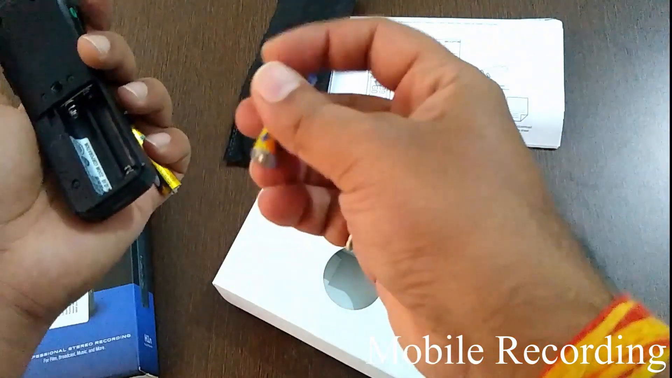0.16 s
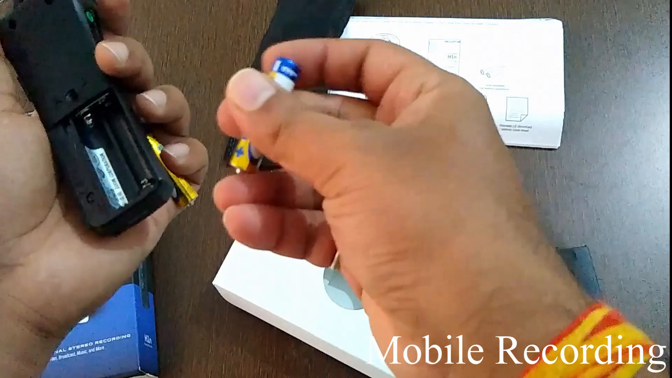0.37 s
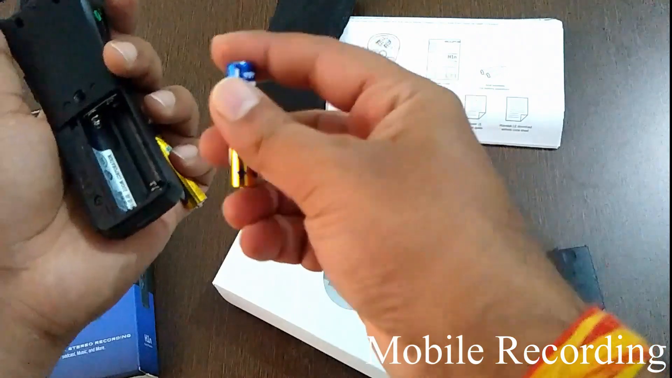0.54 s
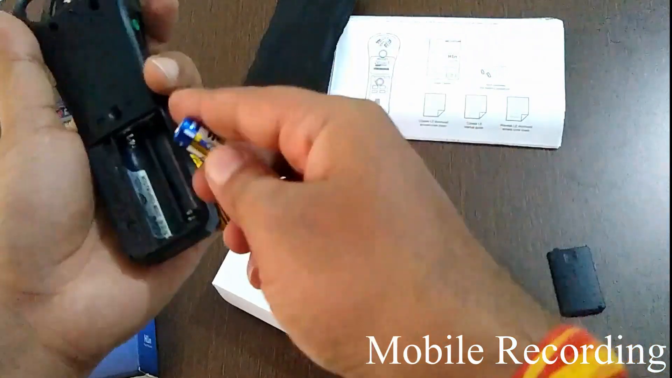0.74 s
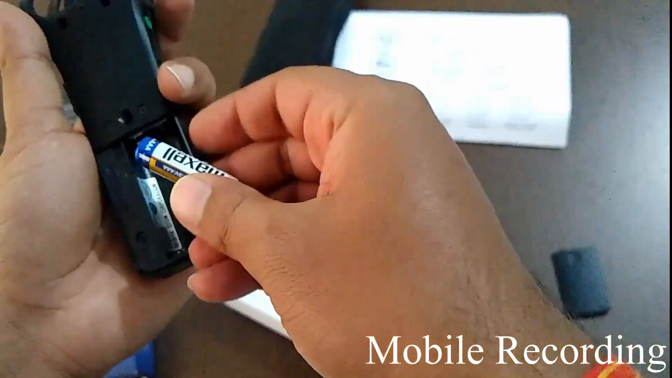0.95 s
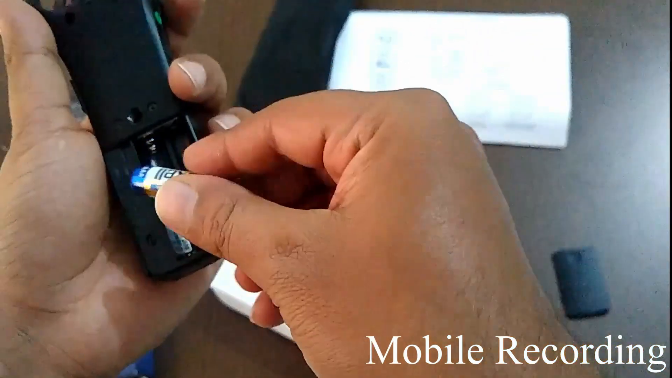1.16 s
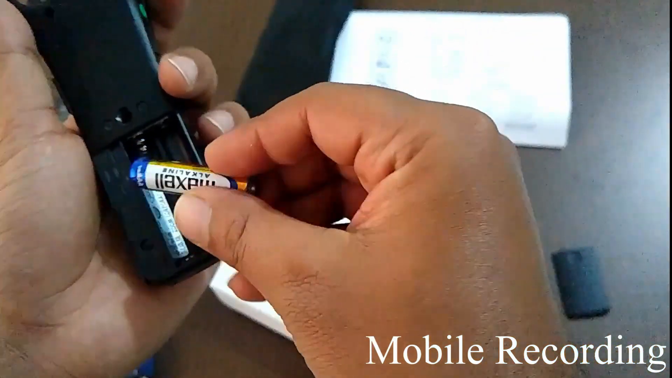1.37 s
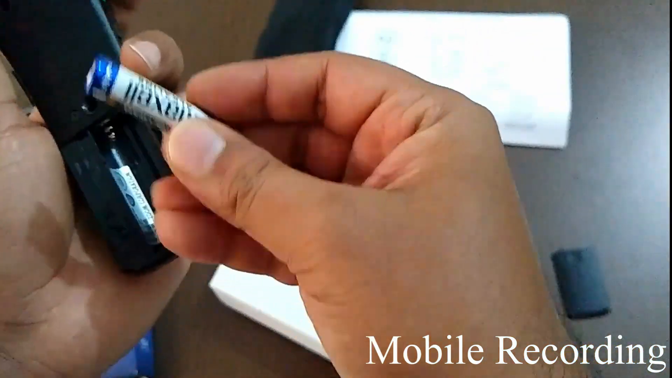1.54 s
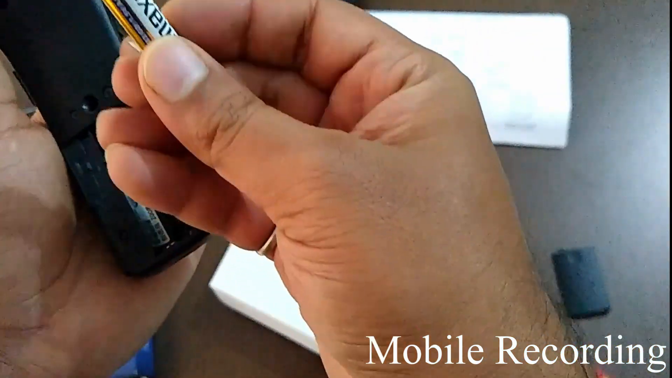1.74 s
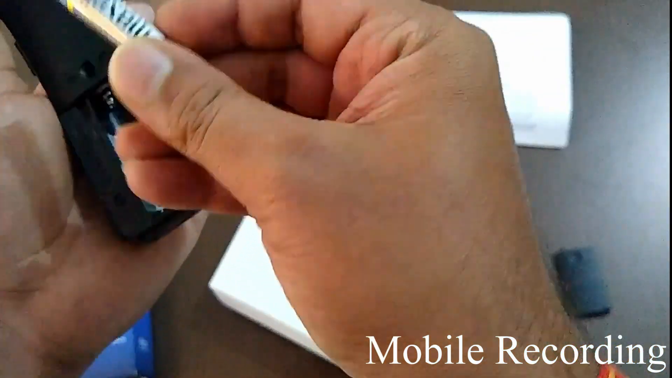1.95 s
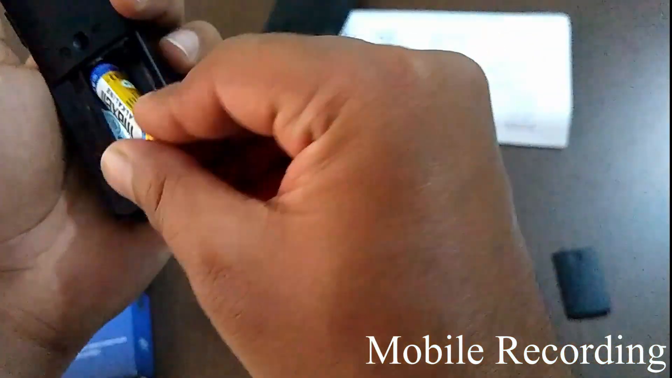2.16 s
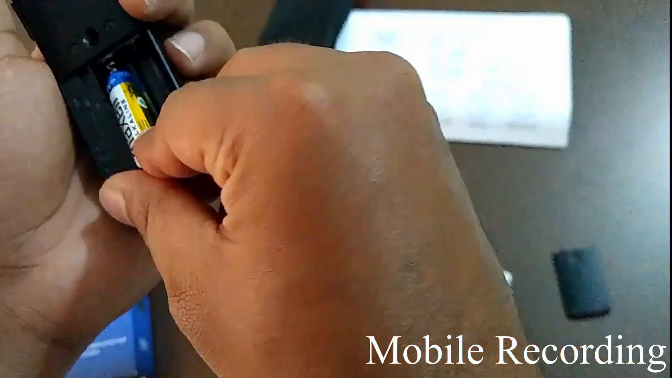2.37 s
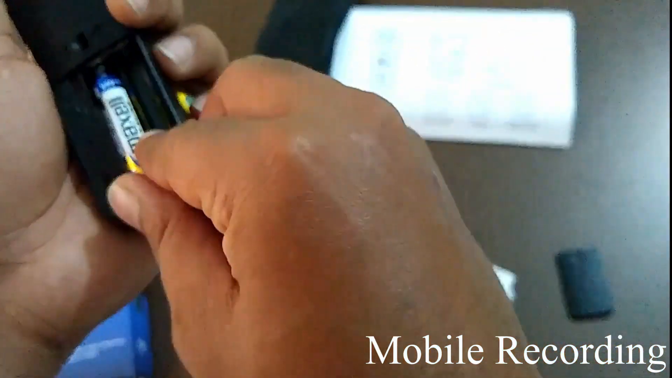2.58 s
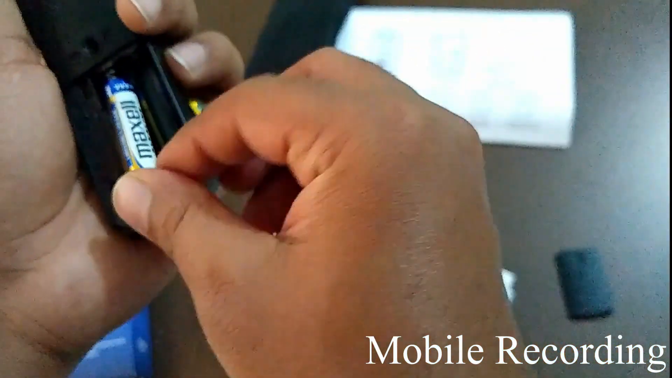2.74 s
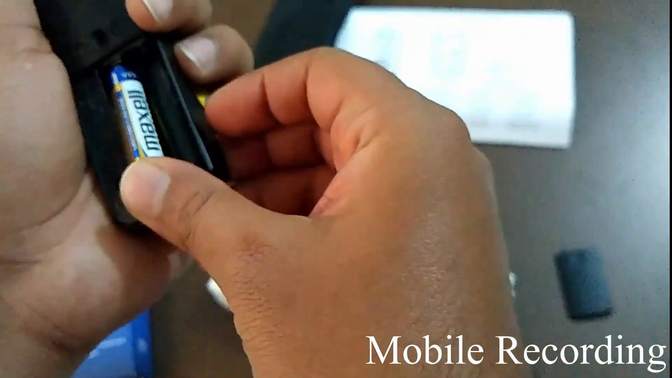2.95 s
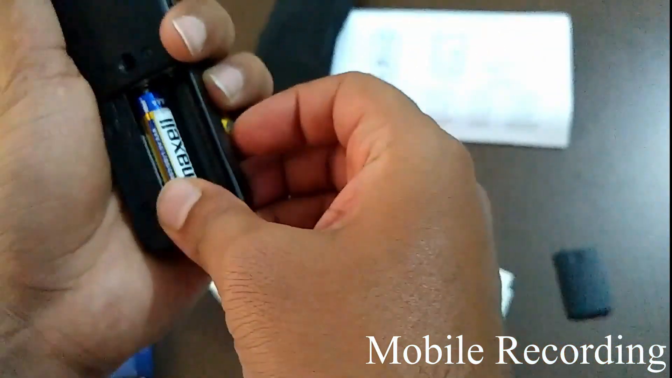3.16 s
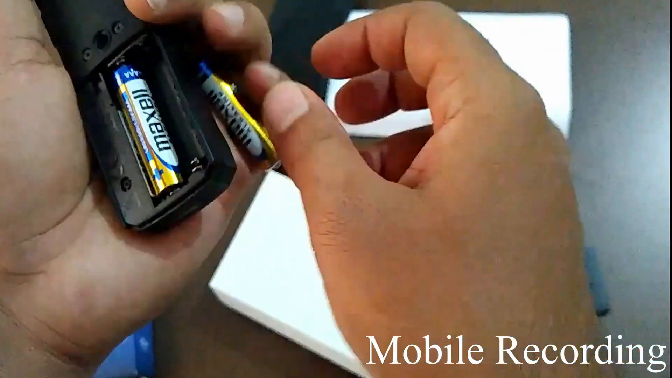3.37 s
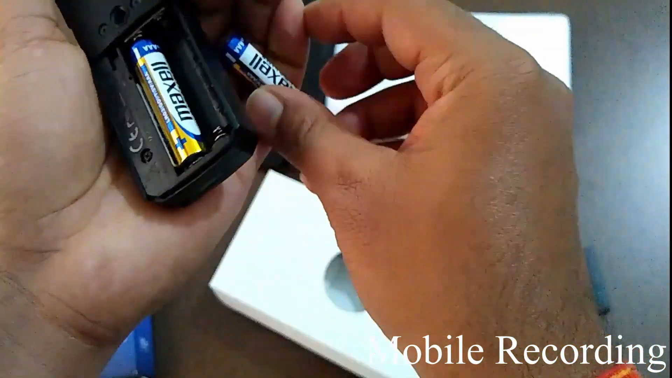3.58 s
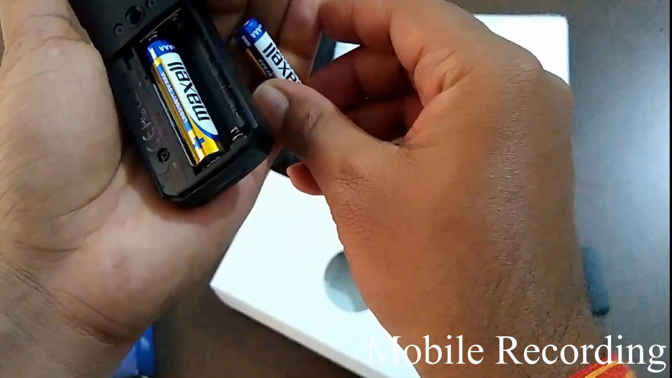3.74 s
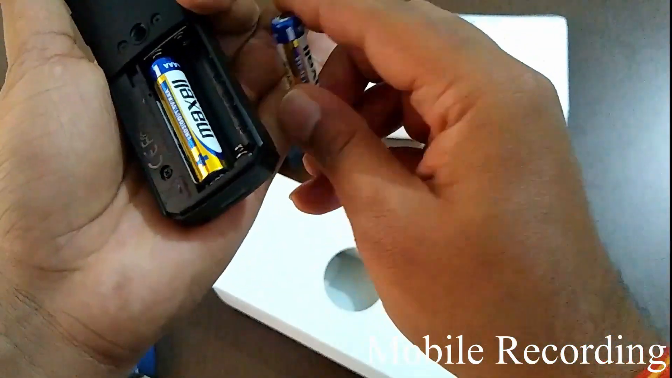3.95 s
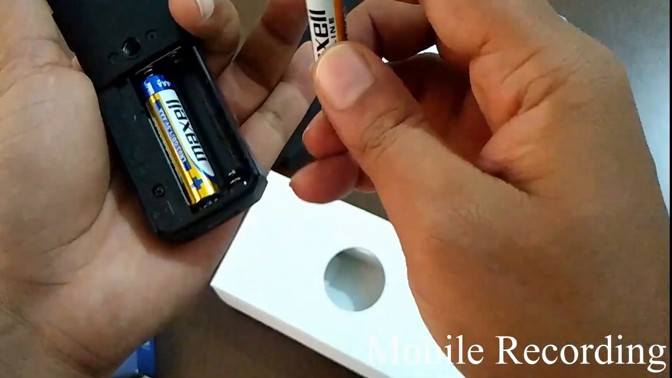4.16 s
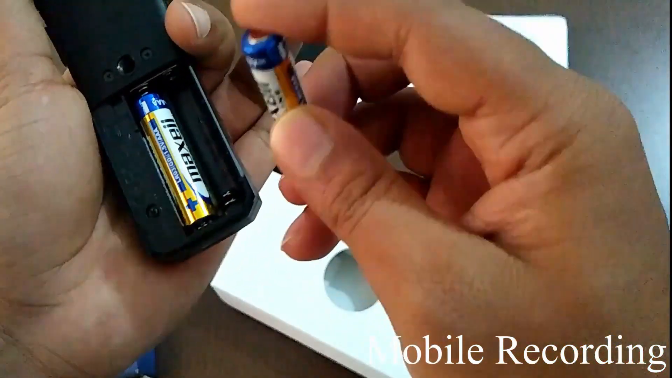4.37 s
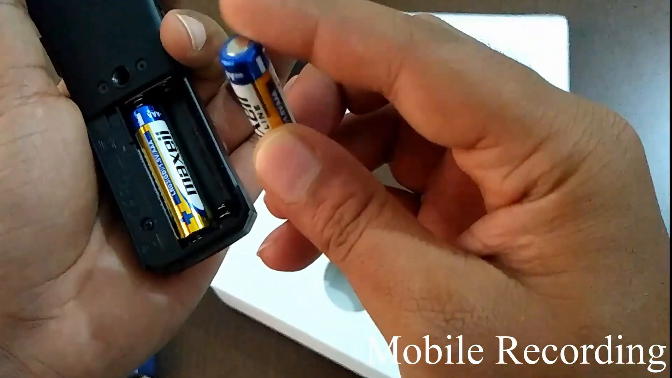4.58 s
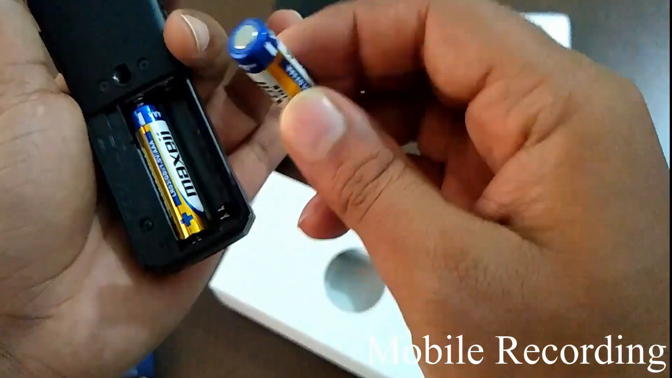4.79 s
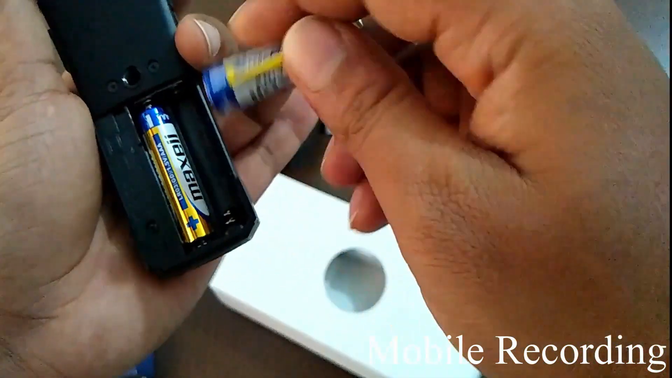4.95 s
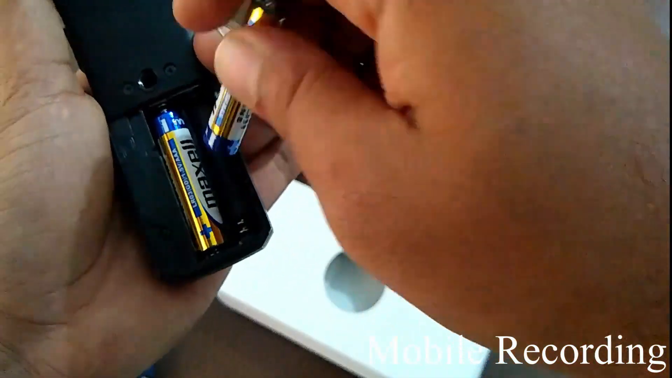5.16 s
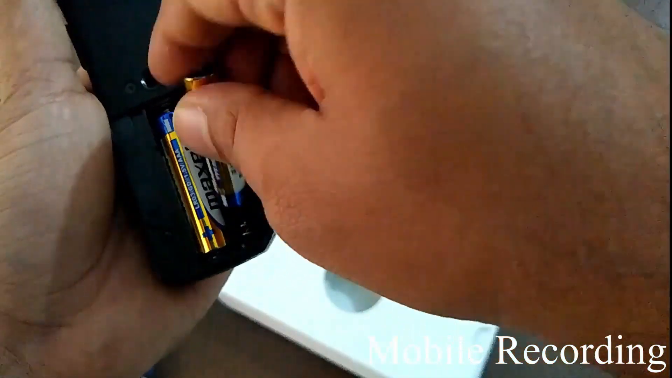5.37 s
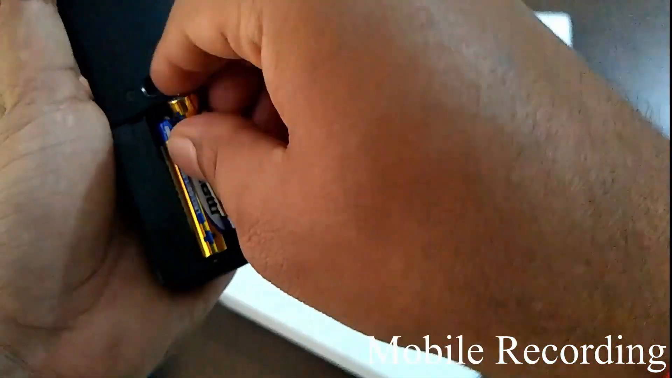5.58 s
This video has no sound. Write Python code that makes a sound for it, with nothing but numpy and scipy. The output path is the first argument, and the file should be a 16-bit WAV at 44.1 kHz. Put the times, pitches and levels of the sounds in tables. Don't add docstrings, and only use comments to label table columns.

```python
import sys
import numpy as np
from scipy import signal
from scipy.io import wavfile
from scipy.ndimage import uniform_filter1d

SR = 44100
rng = np.random.default_rng(int(sys.argv[2]) if len(sys.argv) > 2 else 0)


def boost_factor(decibels):
    exponent = np.asarray(decibels, float) / 20
    return 10 ** exponent


def dump(signal):
    limited = np.clip(np.atleast_2d(signal).T, -1, 1)
    pcm = np.round(limited * 32767).astype(np.int16)
    wavfile.write(sys.argv[1], SR, pcm)


N = 247842

# start_s, level_db
FAN_LEVEL = [(0.0, -47.5), (0.53, -47.5), (1.36, -46), (1.6, -44), (2.13, -44), (2.33, -46.5),
             (2.61, -46.5), (3.01, -43), (4.38, -43.5), (4.71, -44), (5.31, -47), (5.62, -42.5)]
# start_s, lower_mode_hz, upper_mode_hz
GRIP = [
    (.7, 2060, 3400),
    (1.4, 2010, 3350),
    (2.27, 1840, 3330),
    (2.45, 1620, 3430),
    (2.9, 1650, 3380),
    (2.995, 1590, 3000),
    (3.015, 1620, 3620),
    (3.3, 1600, 3560),
    (5.3, 1660, 3340),
]


def evened(x):
    return x / np.sqrt(np.mean(x ** 2) + 1e-20)


def peaked(x):
    return x / abs(x).max()


def read(points, hz):
    f, value = np.transpose(points)
    return np.interp(np.log(hz + 1), np.log(f + 1), value)


def add(mix, s, sound):
    part = mix[round(s * SR):][:len(sound)]
    part += sound[:len(part)]


def resonate(x, hz, width_hz):
    return signal.lfilter(*signal.iirpeak(hz, hz / width_hz, SR), x)


def resonate_twice(x, hz, width_hz):
    return resonate(resonate(x, hz, width_hz), hz, 2 * width_hz)


def band(x, lo_hz, hi_hz):
    return signal.sosfilt(signal.butter(3, [lo_hz, hi_hz], "band", fs=SR, output="sos"), x)


def ring(t, hz, t60, rise_s, bend=1):
    swell = np.sin(np.pi / 2 * np.minimum(t / rise_s, 1)) ** 2
    decay = boost_factor(-60 * (t / t60) ** bend)
    return peaked(np.sin(2 * np.pi * hz * t) * swell * decay)


def gain_drift():
    level_db = np.interp(np.arange(N) / SR, *np.transpose(FAN_LEVEL))
    return level_db, level_db - level_db.mean()


def fan():
    # hz, density_db (per Hz)
    wash_colour = [(15, -73), (25, -30), (87, -31.5), (114, -16), (244, -6.5), (329, -3.5), (431, -4),
                   (684, -11), (1030, -6.5), (1540, -16), (2250, -32), (2880, -25), (4440, -35.5),
                   (13900, -59), (16300, -68)]
    # pitch_hz, width_hz, level_db
    hum_lines = [(59, 4.7, -83.5), (76, 4.9, -84), (122.9, 5.1, -63), (182.75, 2.6, -60.5),
                 (196.3, 15, -56.5), (249, 6.4, -59.5), (316, 11, -64.5), (377.8, 6.6, -57.5),
                 (423.4, 7.1, -58), (441.7, 6.9, -57.5), (517.3, 10, -60), (612, 16, -64.5), (997, 80, -69)]
    columns, hz = N // 512 + 5, np.fft.rfftfreq(2048, 1 / SR)
    a, b, patches = rng.standard_normal((columns, 1025, 3)).T
    patches = evened(uniform_filter1d(uniform_filter1d(patches, 14, 0), 8, 1))
    colour_db = read(wash_colour, hz)[:, None] + 0.47 * patches
    wash = signal.istft((a + 1j * b) * boost_factor(colour_db), nperseg=2048, noverlap=1536)[1]
    hum = np.zeros(N)
    for pitch_hz, width_hz, db in hum_lines:
        hum += boost_factor(db) * evened(resonate(rng.standard_normal(N), pitch_hz, width_hz))
    level_db, drift_db = gain_drift()
    return boost_factor(level_db - 2.0) * evened(wash[:N]) + boost_factor(drift_db) * hum


def hiss():
    _, drift_db = gain_drift()
    return boost_factor(-83 + 0.2 * drift_db) * rng.standard_normal(N)


def pings():
    # start_s, peak_db, top_octave_db (relative)
    spits = [(0.7477, -58, -21), (1.259, -41, -17), (2.2782, -53, -14), (2.2982, -51, -22),
             (2.4562, -51.5, -19), (2.8888, -49, -12), (2.8964, -53, -8), (2.916, -32, -15),
             (2.996, -45, -17), (3.0004, -52, -8), (3.017, -39, -7), (3.0244, -53, -8), (3.0324, -50, -6),
             (3.0384, -54, -10), (3.0484, -50, -19), (3.2894, -58, -12), (3.8352, -63, 0.5),
             (5.3403, -57, -10), (5.4131, -52, -2), (5.4814, -60, 5)]
    out = np.zeros(N)
    for s, db, top_db in spits:
        add(out, s, ping(db, top_db))
    return out


def ping(db, top_db):
    # hz, level_db
    cap_modes = [(8300, 0.5), (10100, -5.5), (11800, -7), (13600, 0), (15300, -8)]
    half_width_hz = 550
    u = np.arange(600) / SR / 0.0013
    burst = rng.standard_normal(600) * u ** 2 * np.exp(-2 * u)
    modes = [boost_factor(g) * band(burst, f - half_width_hz, f + half_width_hz) for f, g in cap_modes]
    return boost_factor(db) * (peaked(sum(modes[:3])) + boost_factor(top_db) * peaked(sum(modes[3:])))


def touches():
    # peak_s, upper_mode_db, lower_mode_db and tick_db (relative), contact_ms
    blows = [
        (1.2624, -10, -17.5, -13, 1.22),
        (2.28, -8.5, -8, -7, 1.29),
        (2.455, -26, 3, -16, 1.7),
        (2.917, -11, 2.5, -7.5, 1.18),
        (2.9981, -18.5, -5.5, -6, 1.77),
        (3.0186, -14.5, 1.5, -5, 1.14),
        (3.0495, -15.5, -7.5, -10, 0.6),
        (5.3395, -24.5, 5.5, -5.5, 0.79),
        (5.4151, -27.5, -7, -4.5, 1.65),
    ]
    # peak_s, level_db, upper_mode_hz
    bounces = [
        (1.2732, -17.5, 3410),
        (1.2795, -24, 2930),
        (1.284, -33, 3400),
        (1.2962, -44, 2810),
        (2.2896, -16.5, 3480),
        (2.2945, -19.5, 3430),
        (2.2991, -26, 3500),
        (2.9257, -39, 3050),
        (3.026, -31, 3540),
        (5.42, -30, 3360),
    ]
    # peak_s, level_db, lower_mode_db and tick_db (relative), upper_mode_hz
    taps = [(0.749, -41.5, -6, -1, 3400), (1.3066, -33.5, -10, -7, 3630), (2.437, -34, -16, -4, 3140),
            (2.5263, -35.5, -26, -25, 3840), (2.605, -43.5, -0.5, -26, 3820),
            (2.6363, -38.5, -5, -15, 3220), (2.7638, -45, 1, -12, 4000), (2.7862, -43.5, 7.5, -5, 3900),
            (2.8911, -36, -6, -3, 3040), (2.8984, -38, 2, -5, 3570), (3.002, -22, 0.5, -13, 3530),
            (3.0325, -25, -16, -11, 3570), (3.0402, -28, 6, -7, 3800), (3.053, -42, 12, 0, 2810),
            (3.2541, -51, 4, 7, 2900), (3.2905, -35, -1.5, 4.5, 3600), (3.9346, -45.5, 5.5, 2.5, 3200),
            (5.4816, -43, -14, 5, 3480)]
    grip_s, _, grip_hz = np.transpose(GRIP)
    rows = [(s, db, low, tick, np.interp(s, grip_s, grip_hz), ms) for s, db, low, tick, ms in blows]
    for s, db, hz in bounces:
        _, _, low_db, tick_db, _ = [blow for blow in blows if blow[0] < s][-1]
        rows.append((s, db, low_db + 6, tick_db - 4, hz, 1.2))
    return rows + [(*row, 1.3) for row in taps]


def knock(s, db, low_db, tick_db, upper_hz, contact_ms):
    # hz, level_db
    tick_modes = [(4850, 4.5), (5330, 5), (6150, 2.5), (7350, -6.5), (8000, -10.5), (9100, -17)]
    ring_per_contact = (5.2, 6.6, 5.2)
    bend = 0.7
    t, contact_s = np.arange(SR // 16) / SR, contact_ms / 1000
    rise = 5e-4 + 0.45 * contact_s
    upper_t60, lower_t60, tick_t60 = contact_s * np.array(ring_per_contact) + rise
    lower_hz = np.interp(s, *np.transpose(GRIP)[:2])
    chance = rng.random(8) - 0.5
    high_twin, low_twin = 1 + 0.042 * chance[:2]

    high = ring(t, upper_hz, upper_t60, rise, bend)
    high += 0.16 * ring(t, upper_hz * 0.926 * high_twin, 0.017, rise)
    low = ring(t, lower_hz, lower_t60 + 0.0012, 1.34 * rise, bend)
    low += 0.17 * ring(t, lower_hz * 1.194 * low_twin, 0.017, rise)
    bright = np.zeros(len(t))
    for (hz, gain_db), c in zip(tick_modes, chance[2:]):
        bright += boost_factor(gain_db) * ring(t, hz * (1 + 0.082 * c), tick_t60 + 0.0029, 0.84 * rise, bend)

    sound = peaked(high) + boost_factor(low_db) * peaked(low) + boost_factor(tick_db - 4.5) * peaked(bright)
    return s - 0.92 * rise - 5e-5, boost_factor(db) * sound


def case_knocks():
    out = np.zeros(N)
    for row in touches():
        add(out, *knock(*row))
    return out


def slips():
    slips_per_s, spread_db = 2600, 2.5
    bunch_db, bunch_s = 3, 0.0081
    grains = rng.standard_normal(N) * boost_factor(spread_db * np.minimum(rng.exponential(1, N), 3))
    grains = evened(grains * (rng.random(N) < slips_per_s / SR)) + 0.9 * rng.standard_normal(N)
    smooth = signal.butter(2, 0.23 / bunch_s, fs=SR, output="sos")
    bunches = evened(signal.sosfilt(smooth, rng.standard_normal(N)))
    return grains * boost_factor(bunch_db * bunches)


def stroke(t, start, length, lean_db):
    u = np.clip((t - start) / length, 0, 1)
    fade_in = (t - start) / 0.0074
    fade_out = 0.5 + (start + length - t) / 0.015
    return np.clip(np.minimum(fade_in, fade_out), 0, 1) * boost_factor(lean_db * u - max(lean_db, 0))


def scrapes():
    # hz, level_db
    edge_colour = [(5550, 10), (7700, 3), (8600, -1), (10500, -2), (13000, -24)]
    # start_s, length_s, top_db, lower_mode_db and edge_db (relative)
    pushes = [
        (0.792, 0.08, -55, 5, -11),
        (2.39, 0.059, -52, -2, -26),
        (2.711, .045, -58, 2.5, -11),
        (2.766, 0.041, -54, -2, -3),
        (5.439, 0.042, -48, -11, -16),
    ]
    # start_s, length_s, top_db, pitch_hz, edge_db (relative)
    slides = [
        (0.751, 0.058, -59.5, 3470, -8),
        (0.896, 0.078, -65, 3000, -12),
        (2.36, 0.028, -47, 3050, -23),
        (2.434, 0.014, -47, 3600, -15),
        (2.457, 0.094, -57, 3400, -19),
        (2.518, 0.038, -55, 3840, -24),
        (2.588, 0.063, -52.5, 3600, -18),
        (3.065, 0.09, -57, 3260, -13),
        (5.42, 0.016, -40, 3280, -25),
        (5.49, 0.071, -62, 2980, -16),
    ]
    rub = slips()
    high = evened(resonate(resonate(rub, 3160, 800), 3930, 1200))
    low = evened(resonate(resonate(slips(), 2000, 1000), 2100, 1200))
    edge = evened(sum(boost_factor(db) * resonate_twice(slips(), hz, 0.17 * hz) for hz, db in edge_colour))
    out, t = np.zeros(N), np.arange(N) / SR
    for s, length, db, low_db, edge_db in pushes:
        sound = high + boost_factor(low_db) * low + boost_factor(edge_db) * edge
        out += stroke(t, s, length, 8.5) * boost_factor(db) * sound
    for s, length, db, hz, edge_db in slides:
        spot = evened(resonate_twice(rub, hz, 510))
        sound = spot + boost_factor(-8.5) * low + boost_factor(edge_db) * edge
        out += stroke(t, s, length, -4.5) * boost_factor(db) * sound
    return out


def thumps():
    # start_s, peak_db, pitch_hz
    case_pushes = [
        (1.259, -31, 1090),
        (2.454, -30.5, 1120),
        (2.916, -10.5, 924),
        (3.018, -19.5, 960),
        (5.338, -26, 920),
        (5.42, -28.5, 862),
    ]
    out, t = np.zeros(N), np.arange(SR // 2) / SR
    for s, db, hz in case_pushes:
        add(out, s + 0.00055, -boost_factor(db - 3.5) * ring(t, hz, 0.0074, 0.00058))
    return out


def spring_twangs():
    # hz, width_hz, level_db, t60_s
    coil_bands = [(2784, 400, -31.5, 0.65), (3050, 190, -42, 0.56), (3600, 350, -41, 0.16)]
    # start_s, level_db
    twangs = [
        (1.261, -10),
        (2.279, -26),
        (2.915, -17),
        (3.018, -22),
    ]
    out, t = np.zeros(N), np.arange(SR // 2) / SR
    for s, db in twangs:
        noise, coil = rng.standard_normal(len(t)), np.zeros(len(t))
        for hz, width_hz, gain_db, t60 in coil_bands:
            coil += boost_factor(gain_db - 60 * t / t60) * evened(resonate_twice(noise, hz, width_hz))
        add(out, s, boost_factor(db) * coil * np.minimum(t / 0.035, 1))
    return out


def squeak():
    # start_s, pitch_hz, level_db
    whine_path = [
        (1.8, 11236, -109),
        (1.814, 11103, -84),
        (1.834, 10891, -89),
        (1.904, 11037, -87),
        (1.96, 10710, -101),
    ]
    s, hz, db = np.transpose(whine_path)
    t = np.arange(N) / SR
    tone = np.sqrt(2) * np.sin(2 * np.pi * np.cumsum(np.interp(t, s, hz)) / SR)
    return tone * boost_factor(np.interp(t, s, db, left=-140, right=-140))


def room(x):
    # hz, t60_s
    reverb_time = [(500, 0.072), (1700, 0.4), (3300, 0.37), (5200, 0.51), (8000, 0.49), (13000, 0.36)]
    taps = np.zeros(SR)
    at = np.arange(340, SR - 20, 20) + rng.integers(0, 20, (SR - 341) // 20)
    taps[at] = rng.choice([-1., 1.], at.shape)
    hz, t, z = signal.stft(taps, SR, nperseg=256)
    decay = boost_factor(-60 * t / read(reverb_time, hz)[:, None])
    tail = signal.istft(z * decay, SR, nperseg=256)[1]
    return signal.fftconvolve(x, tail / np.linalg.norm(tail))[:N]


def housing(x):
    # hz, width_hz, depth (0-1)
    notches = [(2275, 420, 0.3), (4457, 1070, 0.69), (5720, 82, 0), (6680, 1000, 0.65), (8600, 1800, 0.5)]
    for hz, width_hz, depth in notches:
        x = x - depth * resonate(x, hz, width_hz)
    return x


def scene():
    case = case_knocks() + thumps() + pings() + spring_twangs()
    no_bass = signal.butter(3, 560, "high", fs=SR, output="sos")
    hands = signal.sosfilt(no_bass, case) + scrapes()
    at_microphone = housing(hands + boost_factor(-15.5) * room(hands) + fan())
    return (at_microphone + hiss() + squeak())[None]


def thin_patches(x):
    # hz, ratio (of the recent size)
    gate_share = [(4000, .2), (6000, .5), (6800, .85), (7600, .6), (8900, .95), (10000, .8), (15000, .85)]
    hz, _, z = signal.stft(x, SR, nperseg=2048, noverlap=1024)
    size = uniform_filter1d(uniform_filter1d(abs(z), size=6, axis=1), size=2, axis=2)
    steady = np.minimum(size, 1.3 * np.median(size, axis=-1, keepdims=True))
    recent = uniform_filter1d(steady, size=31, axis=2)
    weak = size < read(gate_share, hz)[:, None] * recent
    return signal.istft(z * np.where(weak, boost_factor(-10), 1), SR, nperseg=2048, noverlap=1024)[1][:, :N]


def low_pass(x):
    return signal.sosfilt(signal.butter(12, 16470, fs=SR, output="sos"), x)


def record(dry):
    rumble_filter = signal.butter(2, 45, "high", fs=SR, output="sos")
    cut = thin_patches(signal.sosfilt(rumble_filter, dry))
    band_edge = signal.firwin(501, 15620, window=("kaiser", 7), fs=SR)
    low = signal.oaconvolve(cut, band_edge[None], "same")
    return low_pass(low + boost_factor(-25) * (cut - low))


dry = scene()
out = record(dry)
dump(out)
```